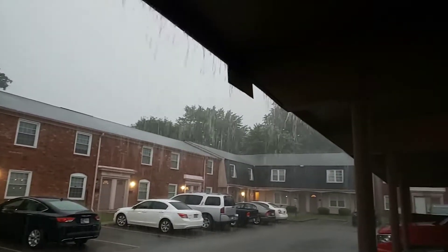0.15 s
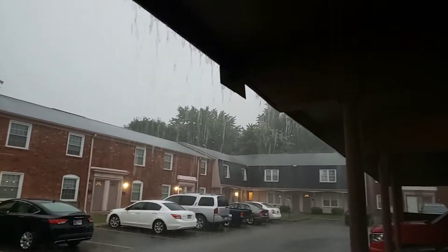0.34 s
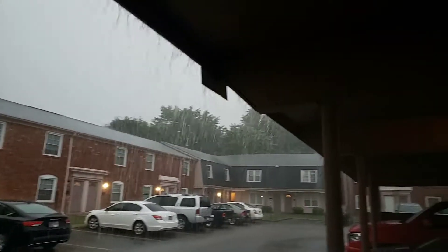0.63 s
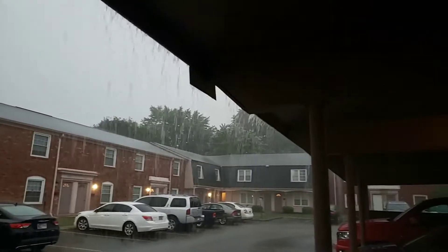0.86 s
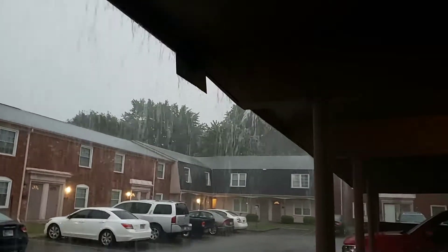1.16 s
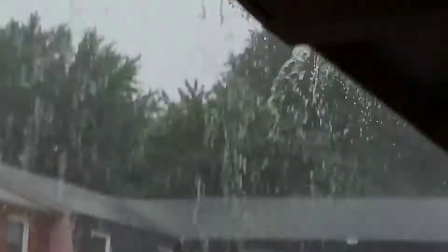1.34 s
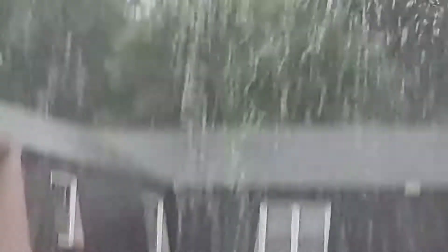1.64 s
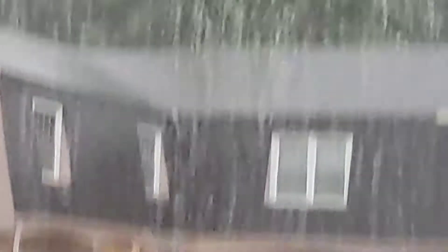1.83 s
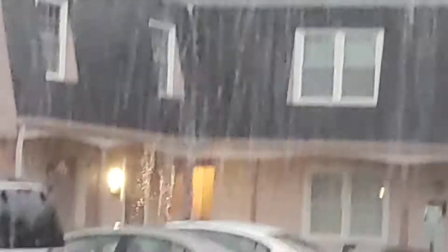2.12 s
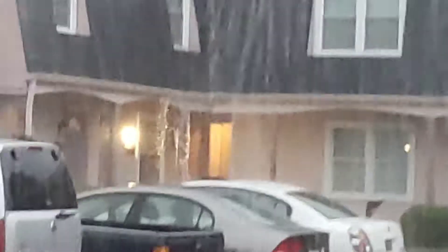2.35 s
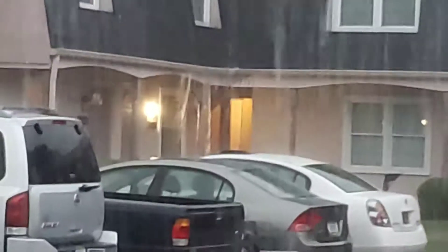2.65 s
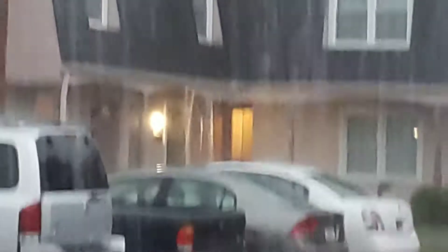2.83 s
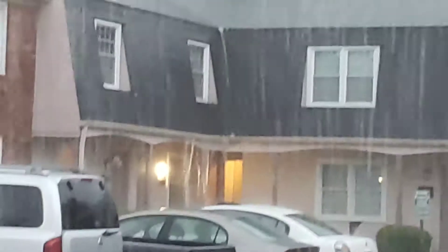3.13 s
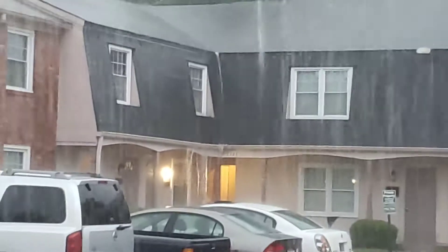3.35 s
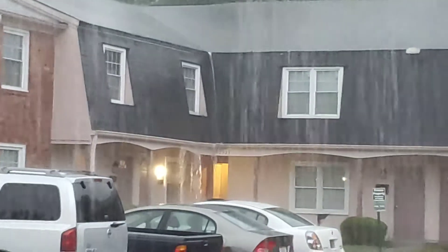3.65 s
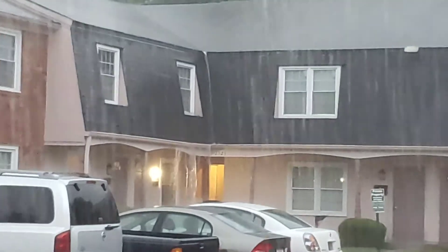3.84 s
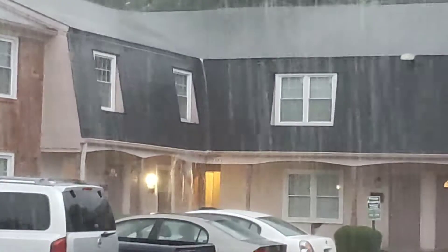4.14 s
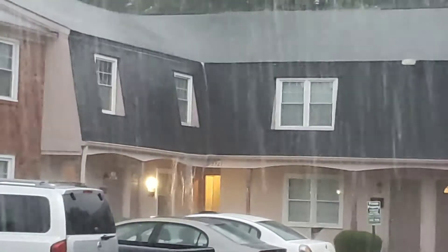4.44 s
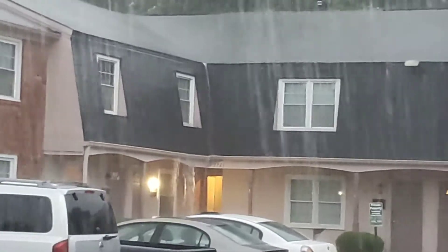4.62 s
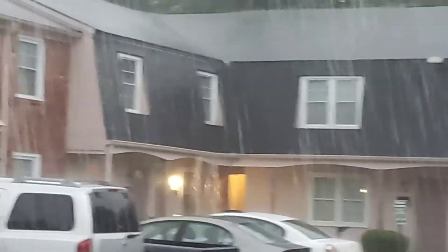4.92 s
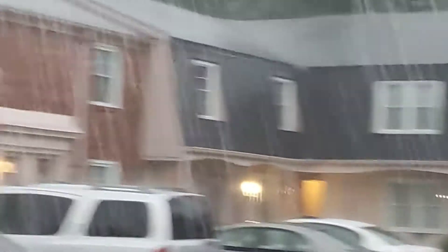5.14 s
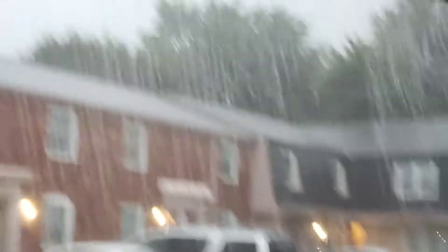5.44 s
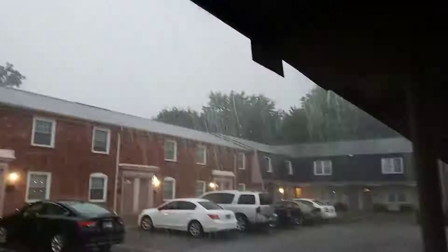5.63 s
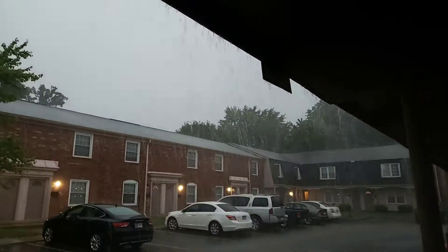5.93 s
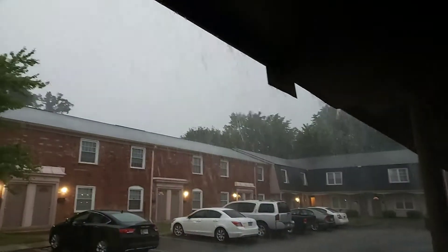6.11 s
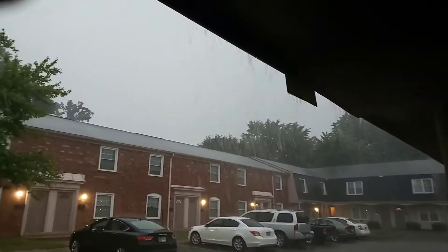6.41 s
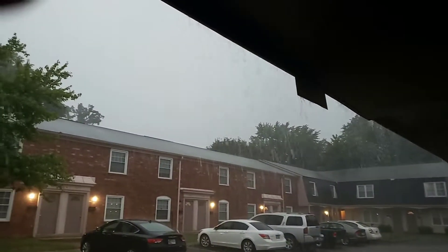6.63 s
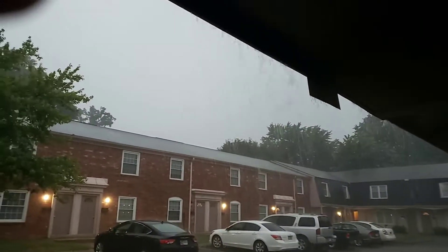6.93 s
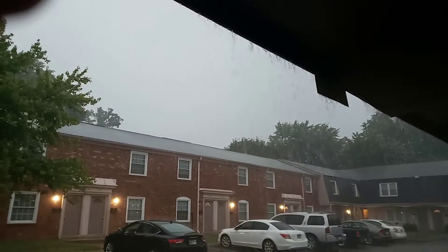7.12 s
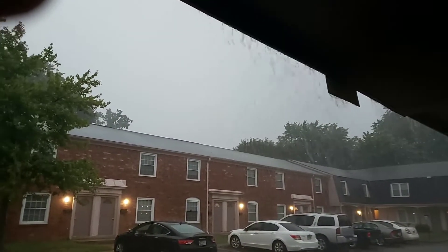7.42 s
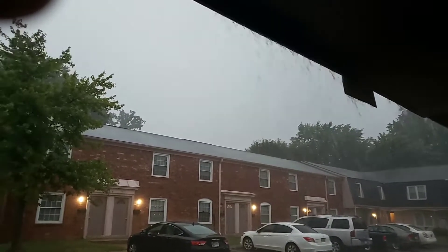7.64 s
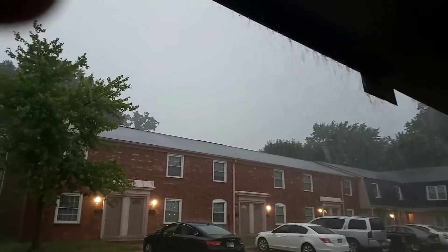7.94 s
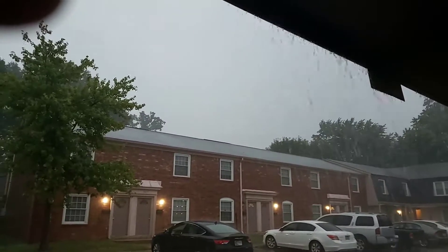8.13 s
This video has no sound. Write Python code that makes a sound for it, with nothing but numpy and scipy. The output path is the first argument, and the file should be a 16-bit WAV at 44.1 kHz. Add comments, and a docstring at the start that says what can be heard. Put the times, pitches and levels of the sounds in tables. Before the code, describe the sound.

A bright, dense downpour with sharp close water splats under a porch roof, as gusty wind thuds and puffs against the microphone.

```python
"""Heavy rain by a porch

Heavy rain falls on a yard, heard from under a porch roof whose runoff splashes on the pavement nearby.
Wind on the two microphone ports of a hand-held phone is shaped noise: a low rumble with thumps, a roar with puffs.
Rain is a noise hiss plus thousands of tiny grains; each runoff splash is a ringing tick with a noisy spray.
Short reflections under the roof follow the nearby drops and splashes."""
import sys
import numpy as np
from scipy import signal
from scipy.fft import rfft, irfft, next_fast_len
from scipy.io import wavfile
from scipy.ndimage import uniform_filter1d

SR = 44100
rng = np.random.default_rng(int(sys.argv[2]) if len(sys.argv) > 2 else 0)


def inscribe(sig):
    """Save sig as 16-bit PCM at rate SR to the path in sys.argv[1].

    A 1-D sig is mono; a 2-D sig holds one channel per row.
    Samples are clipped to [-1, 1] before scaling.
    """
    pcm = np.round(np.clip(np.atleast_2d(sig).T, -1, 1) * 32767)
    wavfile.write(sys.argv[1], SR, pcm.astype(np.int16))


N = 364707  # length in samples

# Tone colour of the wind's rumble and roar: f/Hz, relative level/dB per Hz
RUMBLE_SPECTRUM = [(20, -28), (35, -4.5), (65, 1), (110, -5), (190, -6.5), (240, -7.5), (290, -10),
                   (500, -46)]
ROAR_SPECTRUM = [(150, -58), (230, -18), (290, -3), (370, 1), (430, -2.5), (520, -6.5), (700, -9),
                 (1100, -17), (2000, -33.5)]
# Single eddies striking the ports: t/s, envelope peak level/dB, nominal f/Hz
THUMPS = [(0.0717, -24, 79), (0.36, -23, 81), (1.081, -30, 72), (1.2, -28, 75), (1.486, -21, 77.4),
          (1.6114, -22, 130), (1.6504, -19, 180), (1.8034, -15.5, 87.5), (1.93, -23, 130), (2.065, -19, 82),
          (2.106, -24, 87), (2.218, -15.5, 121), (2.266, -16.5, 160), (2.3046, -16, 209), (2.407, -16, 100),
          (2.4423, -21, 184), (2.653, -18.5, 75.5), (4.34, -28, 70), (4.48, -26, 70), (5.0, -22, 80),
          (5.242, -15, 83), (5.3527, -22, 89), (5.58, -29, 119), (5.6867, -17, 92), (6.0208, -18, 98),
          (6.051, -19, 92), (6.095, -23, 100), (6.3014, -10.5, 90), (6.4502, -18, 132), (6.4946, -20.5, 99),
          (6.5625, -31, 110), (6.7014, -15, 82), (6.799, -33, 84), (7.0908, -20.5, 122), (7.2084, -24, 100),
          (7.2418, -25, 75), (7.5103, -18.5, 140), (7.6004, -14.5, 79.6), (7.8041, -19, 140),
          (7.8664, -18, 73), (7.9739, -29, 58), (8.0576, -27, 140)]
# Wind on the ports: t/s, right rumble level/dB before brightening, steady roar level/dB, roar left minus right/dB
WIND = [(0, -31.5, -39.5, 1), (0.4, -34, -42.5, 0), (0.9, -34.5, -43.5, 0), (1.4, -37.5, -40.5, 2),
        (1.55, -31.5, -42, 2), (2, -29, -37, 1), (2.15, -28, -36, 1), (2.45, -30.5, -38, 3),
        (2.6, -31.5, -40.5, 2), (3.1, -33, -40.5, 1), (3.6, -35, -41, 1.5), (4.5, -40, -41, 3.5),
        (5.1, -34.5, -42, 3), (5.4, -31.5, -39, 4), (5.9, -33, -36.5, 8), (6.2, -33, -42, 0),
        (6.9, -34.5, -41, 0), (7.3, -32.5, -40, 2), (7.6, -30, -41, -1), (7.9, -31, -38.5, 0),
        (8.26, -32, -39, 3)]
# How alike the wind is at the two ports: t/s, likeness (0-1)
LIKENESS = [(0, .88), (1.2, .86), (2.3, .66), (3.5, .4), (6.4, .4), (7.0, .05), (8.27, .05)]
# Spells when the left port loses its rumble: start t/s, length/s, drop level/dB before its edges are softened
LULLS = [(0.93, 0.054, -9), (1.255, 0.25, -20), (1.712, 0.038, -18), (1.95, 0.091, -19), (2.33, 0.068, -18),
         (2.488, .12, -18), (2.693, 0.13, -19), (2.863, 0.13, -24), (3.04, 0.18, -16), (3.236, .12, -19),
         (3.393, 0.045, -7), (3.463, 1.78, -34), (5.268, .07, -22), (5.415, 0.16, -25), (5.596, .085, -33),
         (5.708, .31, -33), (6.065, 0.072, -26), (6.22, 0.032, -20), (6.325, 0.094, -26),
         (6.61, 0.037, -14), (6.69, .06, -24), (6.83, 0.07, -24), (7.09, .04, -16), (7.172, 0.036, -14),
         (7.254, .05, -19), (7.333, 0.054, -10), (7.519, 0.073, -26), (7.706, 0.051, -24),
         (7.89, .045, -11), (8.22, 0.05, -17)]
# Short puffs of roar: centre t/s, length/s, level/dB, left minus right/dB
PUFFS = [(1.49, 0.037, -37.5, 2), (1.595, 0.048, -38, 0), (1.82, 0.078, -37.5, 3), (2.282, 0.092, -37, 4),
         (2.443, 0.022, -33.5, -1), (2.66, 0.089, -40, 2), (2.855, .04, -38, 5), (3.837, .02, -37, 10),
         (4.735, 0.084, -36.5, 11), (5.076, 0.079, -41.5, 10), (5.287, 0.041, -34, 8),
         (5.661, 0.044, -33, 7), (5.759, 0.021, -36, 4), (5.913, .065, -37, 13), (6.063, 0.078, -33, 7),
         (6.092, 0.016, -32, 4), (6.207, 0.046, -36, 8), (6.311, 0.047, -29.5, 9),
         (6.452, 0.039, -34.5, 10), (6.562, 0.025, -34.5, 12), (6.615, 0.014, -39, 11),
         (6.693, 0.044, -31, 9), (6.844, 0.05, -33.5, 9), (7.104, 0.058, -41, 1), (7.218, 0.032, -33.5, 10),
         (7.25, .02, -39, 7), (7.277, .015, -38, 5), (7.42, 0.025, -32.5, 11), (7.531, 0.056, -33.5, 10),
         (7.59, 0.021, -36.5, 2), (7.64, .025, -41, 8), (7.721, 0.028, -32.5, 14),
         (7.818, 0.052, -34.5, 11), (7.894, 0.028, -33.5, 8), (8.234, .028, -40, 3)]
# The largest splashes of runoff: t/s, envelope peak level/dB averaged over both sides, nominal f/Hz
SPLASHES = [(0.0714, -19, 12000), (0.1292, -21, 2900), (0.1825, -15, 11000), (0.4607, -12, 14000),
            (0.5222, -18, 13000), (0.585, -13, 11000), (0.6747, -22, 3100), (0.721, -16, 12000),
            (0.8363, -17.5, 2460), (0.8445, -21, 4300), (1.0398, -23, 2380), (1.0507, -22, 6000),
            (1.3566, -12, 5600), (1.4684, -18, 6400), (1.4955, -21.5, 2520), (1.5096, -14, 6200),
            (1.532, -19, 7300), (1.619, -24, 2490), (1.652, -14.5, 8450), (1.7573, -24, 2380),
            (1.789, -23, 7900), (2.015, -21.5, 2400), (2.0286, -15, 4320), (2.215, -21, 6600),
            (2.2777, -26, 3480), (2.623, -13.5, 4560), (2.637, -13, 12000), (2.7167, -13, 11000),
            (2.751, -26, 3500), (2.7668, -13, 11900), (3.0729, -17, 7440), (3.0852, -19, 2800),
            (3.302, -25.5, 1960), (3.3665, -16, 12000), (3.4155, -18, 5700), (3.6897, -15, 5800),
            (4.1296, -21, 7300), (4.2667, -18, 4330), (4.2815, -13, 5170), (4.446, -25, 2900),
            (4.463, -15, 5000), (4.4876, -14, 5400), (4.8237, -20.5, 2600), (4.9774, -20.5, 2900),
            (5.1936, -15, 6260), (5.366, -12, 12000), (5.6163, -15.5, 5360), (5.704, -18, 5770),
            (5.726, -16.5, 3600), (5.736, -17, 6600), (5.8601, -16, 5500), (5.899, -24, 3420),
            (6.1583, -22, 2480), (6.2687, -12.5, 11000), (6.604, -20, 13000), (6.6525, -26, 3300),
            (6.671, -16, 5100), (6.717, -16, 5500), (6.745, -15, 6000), (7.263, -16, 11500),
            (7.3546, -13, 11400), (7.4662, -25, 3000), (7.6256, -25, 3500), (7.638, -15, 11000),
            (7.8613, -11, 10000)]
# The downpour: t/s, fizz level/dB before random surges, deeper body level/dB against the fizz
RAIN = [(0.0, -26, -18), (0.2, -25, -17.5), (0.9, -27, -11), (1.2, -25, -18), (1.42, -28.5, -13),
        (1.55, -26.5, -18), (2.0, -27, -13), (2.3, -25, -17), (2.85, -28, -12.5), (3.6, -27.5, -15),
        (4.12, -28, -14), (4.45, -27.5, -14), (5.0, -28, -13), (5.85, -27, -15), (6.5, -29.5, -12.5),
        (7.0, -28, -18), (7.6, -28.5, -14), (8.27, -29, -18)]
# Fizz of the rain as the microphones colour it: f/Hz, relative level/dB per Hz
FIZZ_SPECTRUM = [(2000, -15), (2800, -3.5), (3300, -0.5), (4920, 2), (6790, 1.5), (8470, -4.5), (12200, 5),
                 (13600, 5), (14300, -1), (14900, 9), (15400, 2.5)]
# Deeper splashing in puddles: f/Hz, relative level/dB per Hz
BODY_SPECTRUM = [(600, -12), (1100, -10.5), (1660, -6.5), (2500, -6), (3000, -9.5), (4000, -13)]

ROAR_LIKENESS = .8  # share of the rumble's likeness
PUFF_SHARPNESS = 6.5  # higher = squarer
EDGE_S = 0.024  # softened edges of lulls and dips
HUSH_S, HUSH_SHARE = 0.037, 0.57  # dip on the left after a puff, as a share of the puff's excess in dB
PORT_LAG = 19  # samples by which sound from the left reaches the right port later
RAIN_PAN_DB, SPLASH_PAN_DB = 1.5, 6  # left minus right
SURGE_DB, SURGE_S = 0.67, 0.029  # random swelling of the fizz and body together
HISS_LIKENESS = .2  # left-right likeness of the far hiss
DEEP_HZ, SLOSH_DB, SLOSH_T60_S = 3600, -10, 0.12  # splashes below this pitch land in puddles and slosh
SMALL_PER_S, SMALL_MIN_DB, SMALL_SPREAD_DB = 24, -26, 3  # lesser splashes
PORCH_DB = -10  # reflections against the direct sound
EDGE_HZ = 15500  # top of the band


def gain_of(db):
    """Turns decibels into a multiplier."""
    return 10 ** (np.asarray(db) / 20)


def evened(x):
    """Scales a sound to an average strength (RMS) of one."""
    return x / np.sqrt(np.mean(x ** 2) + 1e-20)


def smoothed(x, seconds):
    """Averages each sample with its neighbours over a short time."""
    return uniform_filter1d(x, max(round(seconds * SR), 1))


def read(points, hz):
    """Reads a spectrum table on a log-frequency axis."""
    f, value = np.transpose(points)
    return np.interp(np.log(hz + 1), np.log(f + 1), value)


def curves(rows):
    """Draws each column of a table as a curve, sample by sample."""
    s, *columns = np.transpose(rows)
    return [np.interp(np.arange(N) / SR, s, column) for column in columns]


def sides(db, pan_db):
    """Left and right gains whose mean power is the level."""
    left_power = gain_of(pan_db) ** 2
    powers = np.array([left_power, np.ones_like(left_power)])
    return gain_of(db) * np.sqrt(2 * powers / (1 + left_power))


def add(mix, s, sound):
    """Adds a short sound to the mix, centred on a time in seconds."""
    start = max(round(s * SR) - sound.shape[1] // 2, 0)
    part = mix[:, start:][:, :sound.shape[1]]
    part += sound[:, :part.shape[1]]  # part is a view, so this changes the mix


def colour(x, spectrum):
    """Filters each channel by the spectrum."""
    size = next_fast_len(N)
    gains = gain_of(read(spectrum, np.fft.rfftfreq(size, 1 / SR)))
    return irfft(rfft(x, size) * gains, size)[..., :N]


def noise(size, patch_db, patch_s, patch_hz, flicker_db):
    """Two unrelated noises with drifting patches, plus a flicker shared by all frequencies and both ports."""
    hop = size // 4
    frames, bins = N // hop + 5, size // 2 + 1
    patch_frames = max(round(patch_s * SR / hop), 1)
    patch_bins = max(round(patch_hz * size / SR), 1)
    real, imaginary, patches = rng.standard_normal((frames, bins, 2, 3)).T
    patches = uniform_filter1d(patches, patch_bins, axis=1)
    patches = evened(uniform_filter1d(patches, patch_frames, axis=2))
    flicker = evened(uniform_filter1d(rng.standard_normal(frames), patch_frames))
    spectrum = (real + 1j * imaginary) * gain_of(patch_db * patches + flicker_db * flicker)
    return signal.istft(spectrum, nperseg=size, noverlap=size - hop)[1][:, :N]


def alike(x, share):
    """Lets the right channel share part of the left one."""
    share = np.clip(share, 0, 1)
    return np.array([x[0], share * x[0] + np.sqrt(1 - share ** 2) * x[1]])


def wavelet(hz, cycles, phase):
    """A few cycles under a bell-shaped envelope, pitched about 4 % above the nominal hz."""
    t = np.arange(-3, 3, hz / SR / (cycles / 2.32))  # in widths of the bell
    return np.exp(-t ** 2 / 2) * np.cos(2 * np.pi * cycles / 2.226 * t + phase)


def dying(peaks_db, t60):
    """An envelope that jumps to each peak and falls 60 dB in t60 seconds."""
    fall = 60 / t60 * np.arange(N) / SR
    return gain_of(np.maximum.accumulate(peaks_db + fall) - fall)


def porch(x, t60):
    """Short reflections under the roof: sparse echoes of random sign that die quickly."""
    taps = rng.choice([-1., 1.], (2, 3000)) * (rng.random((2, 3000)) < .05)
    taps = taps * gain_of(-60 * np.arange(3000) / SR / t60)
    tail = signal.oaconvolve(x, taps / np.linalg.norm(taps[0]), axes=1)[:, :N]
    return x + gain_of(PORCH_DB) * tail


def left_rumble_gain():
    """Gain of the rumble at the left port: full, except in the lulls."""
    drop_db = np.zeros(N)
    for s, length, db in LULLS:
        drop_db[round(s * SR):round((s + length) * SR)] = db
    return gain_of(smoothed(drop_db, EDGE_S))


def hush():
    """Left and right gains for the steady roar and the rain's body, dipping on the left after each puff."""
    wind_s, _, roar_db, _ = np.transpose(WIND)
    dip_db = np.zeros(N)
    for s, length, db, _ in PUFFS:
        end = round((s + length / 2) * SR)
        excess_db = max(db - np.interp(s, wind_s, roar_db), 0)
        dip_db[end:end + round(HUSH_S * SR)] = -HUSH_SHARE * excess_db
    return np.array([gain_of(smoothed(dip_db, EDGE_S)), np.ones(N)])


def gusts(roar_db, pan_db):
    """Left and right gains of the roar: its steady power plus that of the puffs."""
    t = np.arange(N) / SR
    power = (sides(roar_db, pan_db) * hush()) ** 2
    for s, length, db, puff_pan_db in PUFFS:
        near = slice(max(round((s - 2 * length) * SR), 0), round((s + 2 * length) * SR))
        shape = np.exp(-abs(2 * (t[near] - s) / length) ** PUFF_SHARPNESS)
        power[:, near] += sides(db, puff_pan_db)[:, None] ** 2 * shape
    return np.sqrt(power)


def wind():
    """Lumpy turbulence at the ports: a rumble with thumps and a roar with puffs."""
    rumble_db, roar_db, roar_pan_db = curves(WIND)
    likeness, = curves(LIKENESS)
    lumps = noise(size=1024, patch_db=2.4, patch_s=.03, patch_hz=200, flicker_db=2.5)
    rumble = alike(evened(colour(lumps, RUMBLE_SPECTRUM)), likeness)
    # stronger gusts shed smaller eddies, so the rumble brightens with its level
    bright = np.clip((rumble_db + 35) / 14, 0, 1)
    upper_rumble = signal.lfilter(*signal.butter(1, 120, "high", fs=SR), rumble)
    rumble = (rumble + 0.27 * bright * upper_rumble) * gain_of(rumble_db)

    phases = rng.uniform(0, 2 * np.pi, len(THUMPS))
    for (s, db, hz), phase in zip(THUMPS, phases):
        # the less alike the ports, the further apart their phases
        shift = np.arccos(likeness[round(s * SR)])
        add(rumble, s, gain_of(db) * wavelet(hz, 0.83, phase + np.array([[0], [shift]])))

    lumps = noise(size=512, patch_db=1.83, patch_s=.02, patch_hz=400, flicker_db=1.9)
    roar = alike(evened(colour(lumps, ROAR_SPECTRUM)), ROAR_LIKENESS * likeness)
    return rumble * [left_rumble_gain(), np.ones(N)] + roar * gusts(roar_db, roar_pan_db)


def splashes():
    """Lists the large splashes, then lesser ones at random times, sizes and pitches."""
    small = []
    for u, v, w in rng.random((round(SMALL_PER_S * N / SR), 3)):
        s = u * (N - 1) / SR
        db = SMALL_MIN_DB - SMALL_SPREAD_DB * np.log(1 - .95 * v)
        hz = 4000 * 3.8 ** w ** 0.67
        small.append((s, db, hz))
    return [*SPLASHES, *small]


def runoff():
    """Each splash is a short ringing tick with a brief spray after it; the deep ones slosh too."""
    ticks = np.zeros((2, N))
    rows = splashes()
    phases = rng.uniform(0, 2 * np.pi, len(rows))
    spray_db, slosh_db = np.full((2, N), -120.)  # practically silent between splashes
    left, right = sides(0, SPLASH_PAN_DB)
    for (s, db, hz), phase in zip(rows, phases):
        tick = gain_of(db) * wavelet(hz, 1.5 + hz / 3500, phase)
        add(ticks, s, np.array([left * tick, 0 * tick]))
        add(ticks, s + PORT_LAG / SR, np.array([0 * tick, right * tick]))
        spray_db[round(s * SR)] = db - 8.5
        if hz < DEEP_HZ:
            slosh_db[round(s * SR)] = db + SLOSH_DB
    water = rng.standard_normal((2, N))
    spray = dying(spray_db, t60=0.036) * evened(colour(water, FIZZ_SPECTRUM))
    slosh = dying(slosh_db, SLOSH_T60_S) * evened(colour(water, BODY_SPECTRUM))
    return ticks + spray + slosh * np.array([[left], [right]])


def drops(per_s, spread_db, lo_hz, hi_hz, cycles, tilt):
    """Random short grains of many pitches, mostly reaching the left first; a few large, the deep ones softer."""
    size = gain_of(spread_db * np.minimum(rng.exponential(1, N), 5))
    size = size * (rng.random(N) < per_s / SR)  # most samples start no drop
    kind, out = rng.integers(0, 32, N), np.zeros((2, N))
    draws = rng.random((32, 3))
    for k, hz in enumerate(np.geomspace(lo_hz, hi_hz, num=32)):
        length_draw, phase_draw, side_draw = draws[k]
        grain = wavelet(hz, cycles * (.5 + length_draw), 2 * np.pi * phase_draw) * hz ** tilt
        train = signal.oaconvolve(size * (kind == k), grain, "same")
        lag = round(PORT_LAG * (1 - 2 * side_draw ** 4))
        out += [train, np.roll(train, lag) * gain_of(1.5)]
    return evened(out)


def rain():
    """The far hiss of countless drops, and the nearer patter of runoff on the pavement."""
    fizz_db, body_db = curves(RAIN)
    surge = smoothed(smoothed(rng.standard_normal(N), SURGE_S), SURGE_S)
    fizz_db = fizz_db + SURGE_DB * evened(surge)
    hiss = noise(size=256, patch_db=3.0, patch_s=.02, patch_hz=500, flicker_db=1.0)
    hiss = alike(evened(hiss), HISS_LIKENESS)
    hiss[1] = np.roll(hiss[1], PORT_LAG)
    patter = drops(per_s=2500, spread_db=3.5, lo_hz=1043, hi_hz=16260, cycles=1.0, tilt=0.64)
    water = hiss + gain_of(-7.5) * porch(patter, t60=0.21)
    fizz = evened(colour(water, FIZZ_SPECTRUM))
    body = gain_of(body_db) * hush() * evened(colour(water, BODY_SPECTRUM))
    return (fizz + body) * sides(fizz_db, np.full(N, RAIN_PAN_DB))


def scene():
    """Wind, rain and the porch runoff together."""
    return wind() + rain() + porch(runoff(), t60=0.048)


def record(dry):
    """Cuts off everything above the top of the band."""
    low_pass = signal.firwin(2047, EDGE_HZ, window=("kaiser", 9), fs=SR)
    return signal.oaconvolve(dry, low_pass[None], "same")


dry = scene()
out = record(dry)
inscribe(out)
```